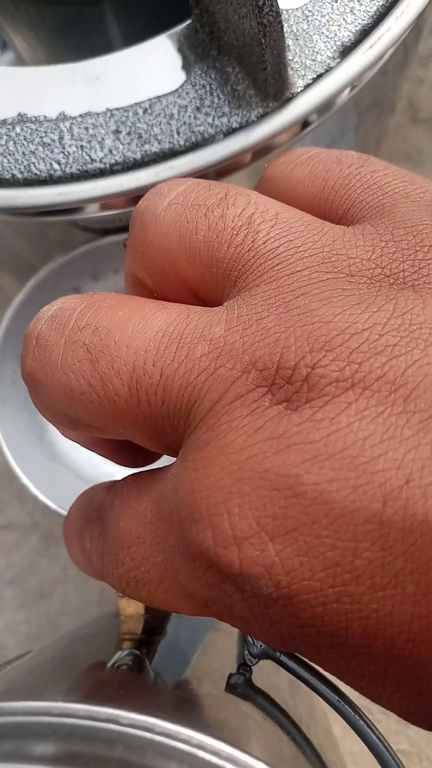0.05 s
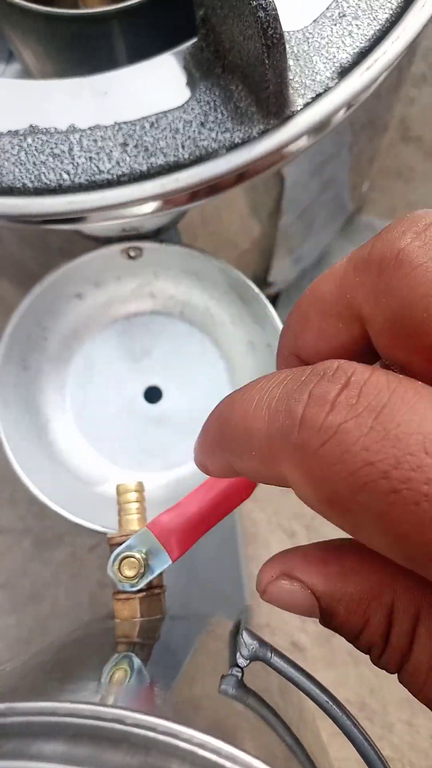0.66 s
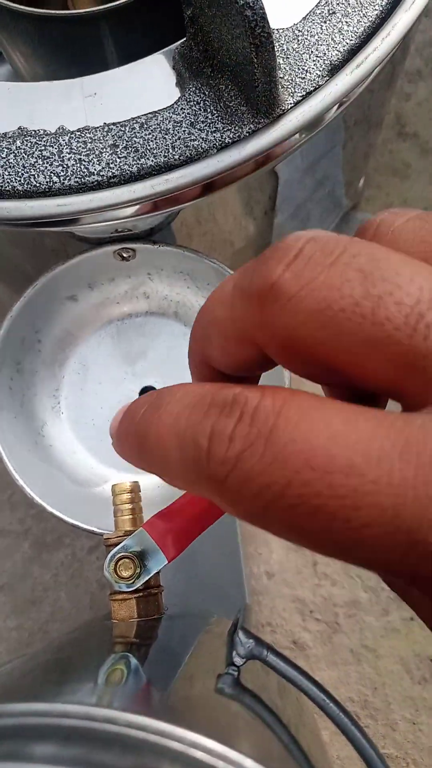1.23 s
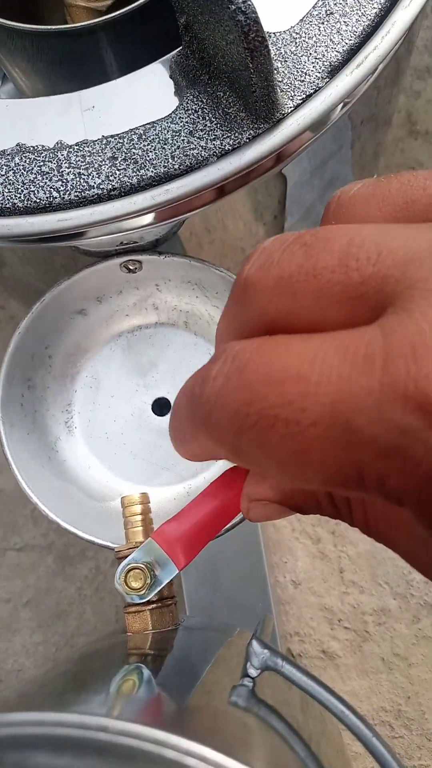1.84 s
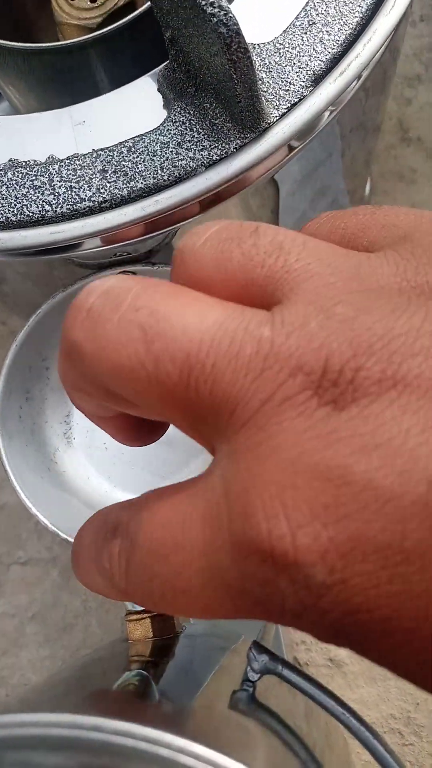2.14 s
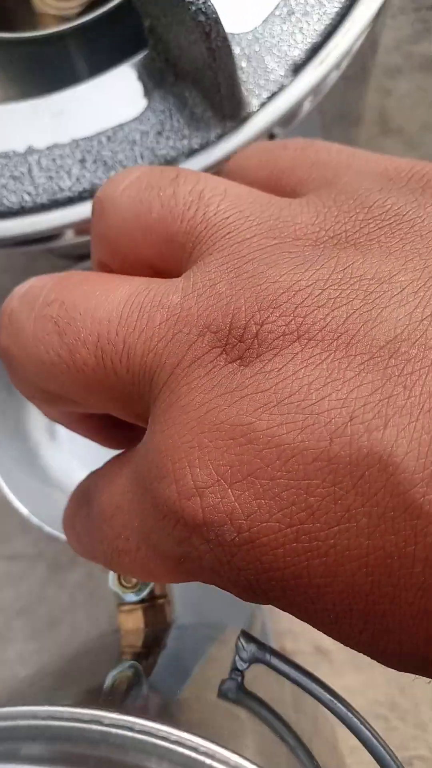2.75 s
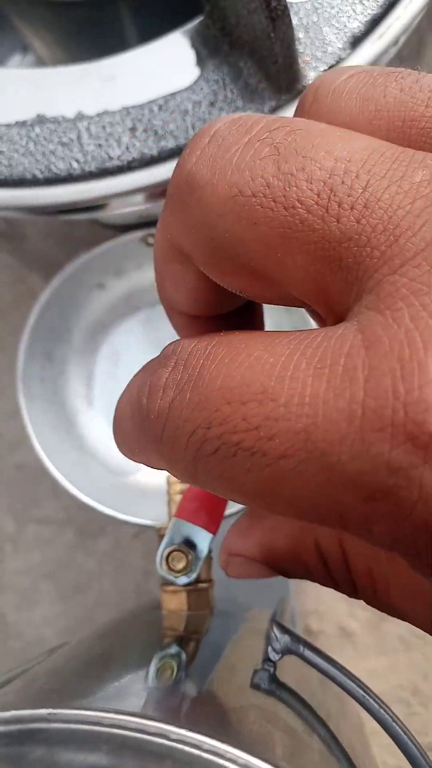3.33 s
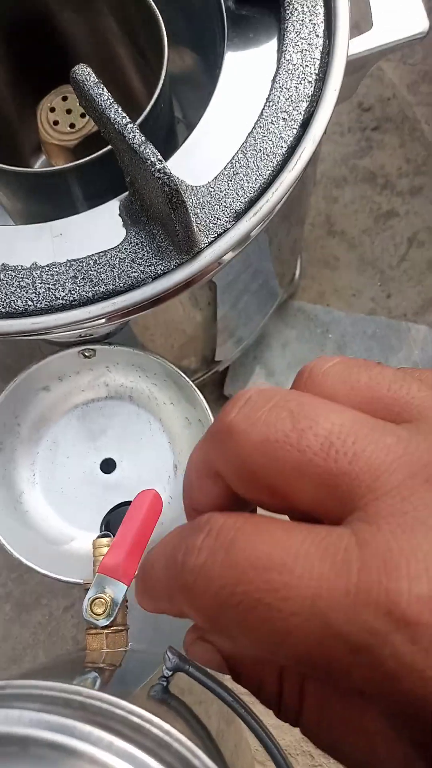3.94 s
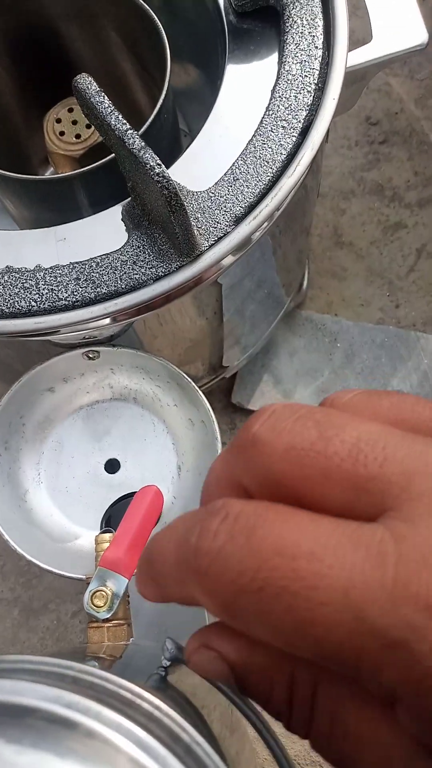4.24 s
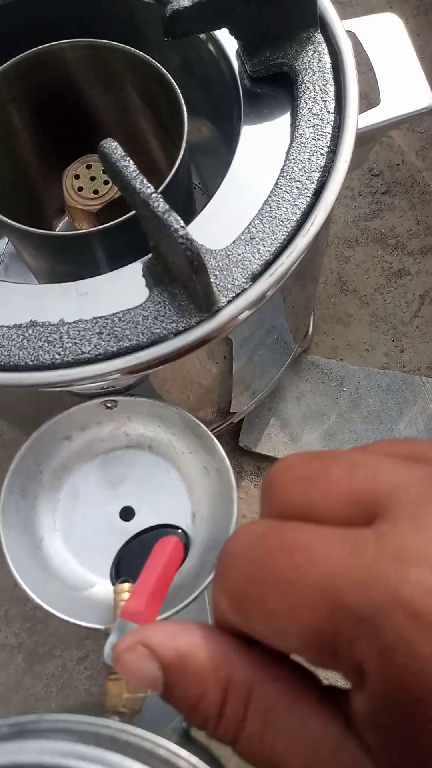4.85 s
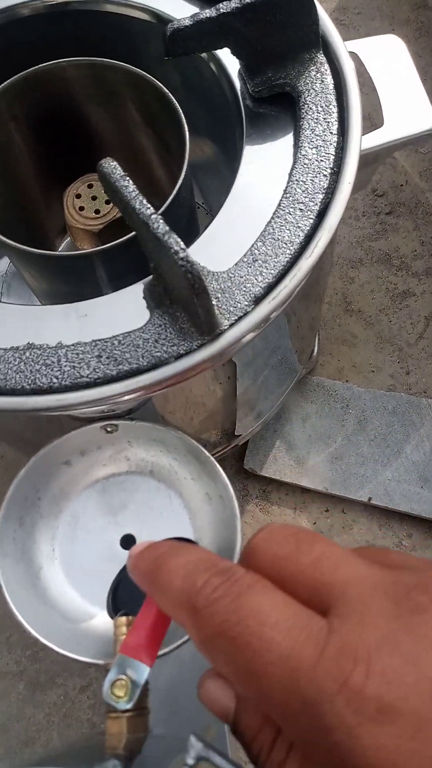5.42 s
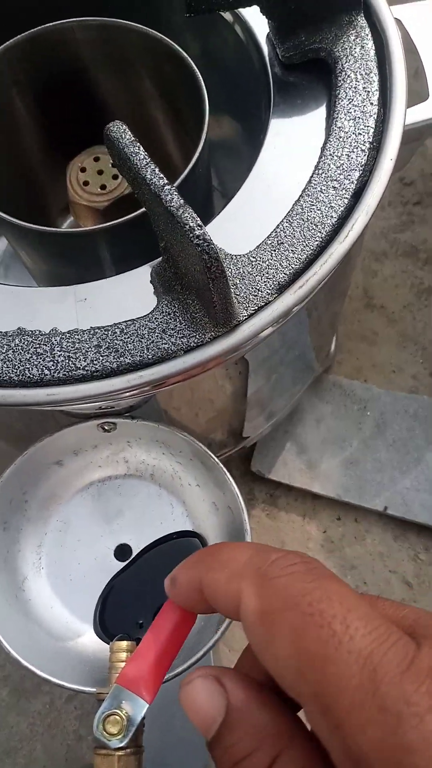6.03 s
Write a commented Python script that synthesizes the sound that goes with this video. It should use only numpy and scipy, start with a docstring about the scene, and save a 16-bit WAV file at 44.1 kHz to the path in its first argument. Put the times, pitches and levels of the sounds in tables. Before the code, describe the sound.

A distant engine hums in a yard while a hand brushes softly over a steel stove close to the microphone. A bird gives a few faint, hoarse calls. A brass valve turns with a rough, wavering squeak, and its lever grates and snaps against the stop. A songbird warbles, then comes a cluster of sharp, ringing metal clicks and scrapes, and finally a loud, dull finger thud.

```python
"""Outdoors, a far engine hums low while a hand brushes over a steel oil stove and a harsh bird calls.
From about 2 s the brass valve turns, rubbing and singing, and a songbird gives a few pips.
The valve's lever grates, clicks twice and snaps against its stop at 3.5 s; then the songbird warbles.
Around 5 s metal scrapes and clicks, ringing the steel, and at 5.7 s a finger thuds.
The yard walls echo the birds and, faintly, the knocks."""
import sys
import numpy as np
from scipy import signal
from scipy.fft import rfft, irfft, next_fast_len
from scipy.io import wavfile
from scipy.ndimage import uniform_filter1d, map_coordinates

SR = 44100
rng = np.random.default_rng(int(sys.argv[2]) if len(sys.argv) > 2 else 0)


def wav_record(signal):
    """Record a signal, one row per channel, as 16-bit PCM in the file named by sys.argv[1]."""
    frames = np.transpose(np.atleast_2d(signal))
    bounded = np.clip(frames, -1, 1)
    # unit amplitude maps onto the largest positive 16-bit level
    quanta = np.round(bounded * 32767).astype(np.int16)
    wavfile.write(sys.argv[1], SR, quanta)


N = 268171

# Tone colour of rustling skin: frequency_hz, level_db
RUSTLE_SPECTRUM = [(1200, -6.5), (2000, 2.5), (3300, 4), (4500, -2.5), (6200, -1.5), (7200, -16),
                   (8300, -27.5), (12000, -35.5)]
# Tone colour of soft, dull rubbing: frequency_hz, level_db
BRUSH_SPECTRUM = [(150, -31), (350, 11.5), (600, 15.5), (1000, -3), (1400, 10), (2000, -29), (3000, -54)]
# Tone colour of metal hitting metal: frequency_hz, level_db
CRACK_SPECTRUM = [(300, -32), (750, -15), (1300, -15.5), (1850, 1.5), (2500, -9), (3400, 0.5), (4400, -5),
                  (5900, 1.5), (7200, -11.5), (8500, -22.5), (11000, -32.5), (13500, -36), (14600, -25),
                  (15500, -22)]


def amp(db):
    """Turn decibels into a gain; amp(-60 * t / ring_s) fades by 60 dB in ring_s seconds."""
    return 10 ** (np.asarray(db) / 20)


def unit(x):
    """Scale a signal to an average (rms) level of 1."""
    return x / np.sqrt(np.mean(x ** 2) + 1e-20)


def along(points, hz):
    """Read between (frequency_hz, value) points, with octaves evenly spaced."""
    point_hz, values = np.transpose(points)
    return np.interp(np.log(hz + 1), np.log(point_hz + 1), values)


def level_curve(rows):
    """A level in dB for every sample from (time_s, level_db) rows, fading fast outside them."""
    times, levels = np.transpose(rows)
    t = np.arange(N) / SR
    outside_s = np.abs(t - np.clip(t, times[0], times[-1]))
    return np.interp(t, times, levels) - 200 * outside_s


def wobble(rate, size=N):
    """A smooth random curve that passes through rate new values a second."""
    values = rng.standard_normal(int(size * rate / SR) + 4)
    return map_coordinates(values, [np.arange(size) * rate / SR])


def swell(length_s, shape):
    """An arch that rises and falls; a smaller shape gives a flatter top."""
    return np.abs(np.sin(np.linspace(0, np.pi, int(length_s * SR)))) ** shape


def filtered(x, response):
    """Pass a sound through a filter: a function that gives the gain at each frequency."""
    size = next_fast_len(len(x) + 8192)
    return irfft(rfft(x, size) * response(np.fft.rfftfreq(size, 1 / SR)), size)[:len(x)]


def lowpass(cutoff_hz, steepness, response=lambda hz: 1):
    """A filter that cuts the highs, on top of another filter if one is given."""
    return lambda hz: response(hz) / (1 + (hz / cutoff_hz) ** steepness)


def colour(points, tilt_db=0):
    """A filter through (frequency_hz, level_db) points, brighter by tilt_db per octave."""
    return lambda hz: amp(along(points, hz) + tilt_db * np.log2((hz + 1) / 4000))


def body(modes):
    """A filter made of resonances, each (pitch_hz, width_hz, level_db)."""
    return lambda hz: sum(amp(db) * 1j * hz * width / (pitch ** 2 - hz ** 2 + 1j * hz * width)
                          for pitch, width, db in modes)


def noise(response, size=N):
    """Filtered noise with an average level of 1."""
    return unit(filtered(rng.standard_normal(size), response))


def patchy(x, depth_db):
    """Give a noise drifting louder and softer patches; the top treble stays smooth."""
    hz, _, spectra = signal.stft(x, SR, nperseg=1024)
    patches = uniform_filter1d(rng.standard_normal(spectra.shape), size=6, axis=0)
    patches = uniform_filter1d(patches, size=14, axis=1)
    gain = amp(depth_db * lowpass(7500, 8)(hz[:, None]) * np.tanh(unit(patches)))
    return unit(signal.istft(spectra * gain, nperseg=1024)[1][:N])


def shortest_pulse(points, size=4096):
    """The shortest pulse with this tone colour, with a peak of 1."""
    cepstrum = irfft(np.log(colour(points)(np.fft.rfftfreq(size, 1 / SR))))
    # folding the second half onto the first packs the energy at the start
    cepstrum[1:size // 2] *= 2
    cepstrum[size // 2:] = 0
    pulse = irfft(np.exp(rfft(cepstrum)))
    return pulse / np.abs(pulse).max()


def add(track, start_s, sound):
    """Mix a sound into a track."""
    room = track[round(start_s * SR):][:len(sound)]
    room += sound[:len(room)]


def yard_echo(x):
    """The walls throw a sound back, and each frequency dies away at its own speed."""
    # How long the echo lasts: frequency_hz, ring_s
    echo_times = [(200, 0.36), (2500, 0.34), (6000, 0.057), (12000, 0.23)]
    hz, t, spectra = signal.stft(rng.standard_normal(SR // 2), SR, nperseg=256)
    fade = amp(-60 * t / along(echo_times, hz)[:, None])
    tail = signal.istft(spectra * fade, SR, nperseg=256)[1]
    return signal.fftconvolve(x, tail / np.linalg.norm(tail))[:N]


def background():
    """A far engine drones in a few low bands over outdoor air and microphone hiss."""
    # The engine's slow rise and fall: time_s, level_db
    hum_levels = [(0.0, -48), (0.25, -49.5), (0.91, -48), (1.17, -51), (1.58, -51.5), (1.95, -49.5),
                  (2.3, -50), (2.7, -48), (3.5, -50), (3.8, -49.5), (4.4, -49), (4.85, -48.5),
                  (5.61, -47.5), (6.08, -48)]
    # The engine's low bands: pitch_hz, width_hz, level_db
    hum_bands = [(72, 6.6, 1.5), (93.1, 8.4, -0.5), (127.6, 21.7, 0), (172.6, 12.9, 3), (271, 33, -15)]
    # Tone colour of the air: frequency_hz, level_db
    air_spectrum = [(30, -25), (100, 3.5), (300, -2), (520, -0.5), (700, -8), (950, -24.5), (1300, -3.5),
                    (2000, -7), (2500, -25), (3100, -12), (4400, -19.5), (6200, -19.5), (8300, -42),
                    (15800, -41)]
    # Tone colour of the hiss: frequency_hz, level_db
    hiss_spectrum = [(12500, -26), (13800, -14), (14500, -2), (15800, 0)]
    engine = lowpass(520, 4, body(hum_bands))
    drone = noise(lambda hz: engine(hz) * hz ** 3 / (hz ** 3 + 48 ** 3))  # thins out below 48 Hz
    air = patchy(noise(colour(air_spectrum)), depth_db=9)
    hum_db = level_curve(hum_levels) + 2 + 2 * wobble(12)
    return amp(hum_db) * drone + amp(-60) * air + amp(-85.5) * noise(colour(hiss_spectrum))


def faint_noise_bands():
    """Faint, narrow bands of noise come and go, each holding one pitch."""
    # Faint held bands: start_s, length_s, pitch_hz, level_db
    bands = [(0, 0.17, 3160, -65.5), (0.119, 0.18, 1280, -60.5), (0.397, 0.41, 5680, -72.5),
             (0.705, 0.41, 1810, -61), (0.852, 0.14, 860, -59.5), (0.944, 0.31, 4360, -69.5),
             (1.087, 0.18, 2580, -68), (1.586, 0.18, 4330, -69.5), (1.702, 0.31, 5810, -76),
             (2.697, 0.27, 4280, -68), (3.052, 0.46, 5780, -70.5), (3.602, 0.21, 5650, -75),
             (4.055, .14, 910, -69.5), (4.307, 0.17, 3540, -63)]
    out = np.zeros(N)
    for start_s, length_s, pitch_hz, db in bands:
        arch = swell(length_s, 0.095)
        band = body([(pitch_hz, 260, 0)])
        add(out, start_s, amp(db) * arch * noise(lambda hz: band(hz) ** 2, len(arch)))
    return out


def airy_slides():
    """A narrow band of noise sinks in pitch, slowly at first and then faster, wavering a little."""
    # Thin falling tones: start_s, length_s, start_hz, end_hz, level_db
    slides = [(0.0, 0.16, 4220, 4030, -67.5), (0.467, 0.18, 4380, 4060, -69.5),
              (.63, 0.24, 3480, 3180, -59.5), (1.46, 0.14, 3130, 2900, -68),
              (1.953, 0.2, 4340, 3800, -65.5), (2.27, 0.21, 3760, 3460, -70.5),
              (2.86, 0.15, 4400, 4010, -63.5)]
    out = np.zeros(N)
    for start_s, length_s, start_hz, end_hz, db in slides:
        arch = swell(length_s, 0.5)
        size = len(arch)
        hz = start_hz + (end_hz - start_hz) * np.linspace(0, 1, size) ** 2 + 50 * wobble(35.55, size)
        low_noise = signal.hilbert(noise(lowpass(300, 2), size))
        band = np.real(low_noise * np.exp(2j * np.pi * np.cumsum(hz) / SR))  # shifted up by hz
        add(out, start_s, amp(db) * arch * band)
    return out


def harsh_bird():
    """A hoarse note rises and falls in an arch, its overtones shaped by the bird's throat."""
    # Far calls: start_s, length_s, top_hz, bend (share the ends drop), level_db, tilt_db, rasp (0-1)
    calls = [(0.87, 0.15, 625, 0.19, -54, 3.5, 0.2), (1.697, 0.16, 592, 0.17, -54.5, 2.5, 0.28),
             (2.406, 0.072, 842, 0.065, -50.5, -6, 0.37), (2.537, 0.17, 585.4, 0.19, -51, -4.5, 0.6)]
    # The throat's filter: frequency_hz, level_db
    throat_spectrum = [(500, -23.5), (850, -2), (1250, -1.5), (1750, -1), (2300, 2), (2700, -19),
                       (3000, -3.5), (3500, -2), (4000, -31), (7000, -62)]
    out = np.zeros(N)
    for start_s, length_s, top_hz, bend, db, tilt_db, rasp in calls:
        arch = swell(length_s, 1.0)
        size = len(arch)
        jitter = .021 * (wobble(400, size) + .6 * wobble(45, size))
        hz = top_hz * (1 - bend * (1 - arch) + jitter)
        phase = 2 * np.pi * np.cumsum(hz) / SR
        throat = colour(throat_spectrum, tilt_db)
        voice = sum(throat(k * hz) * np.sin(k * phase) * (1 + min(rasp, .5) * wobble(251.6, size))
                    for k in range(1, 11))
        breath = min(rasp, .4) * noise(throat, size)
        add(out, start_s, amp(db) * np.sqrt(arch) * (unit(voice) + breath))
    return out


def songbird():
    """Quick whistles leap from one pitch to another; a fast flutter of pitch and level roughens them."""
    # Five kinds of note, all listed as: start_s, start_hz, end_hz, level_db
    flicks = [(3.983, 2750, 3260, -54), (4.311, 2860, 3410, -57.5), (4.7, 2820, 3330, -52.5),
              (5.537, 2920, 3300, -53), (5.656, 3670, 3910, -54.5)]  # high notes that open a phrase
    slurs = [(3.997, 1640, 2530, -53), (4.319, 1637, 2560, -51), (4.711, 1597, 2490, -52.5),
             (4.99, 1346, 1766, -58.5), (5.553, 1650, 2350, -55.5), (5.68, 1628, 2290, -52),
             (5.84, 1630, 2360, -55.5)]  # rough upward sweeps
    lilts = [(2.428, 2150, 2357, -50.5), (4.139, 2006, 2140, -47), (4.175, 2180, 2434, -51.5),
             (4.478, 1950, 1940, -48.5), (4.52, 2210, 2380, -51), (4.843, 1847, 1990, -53.5),
             (4.888, 2210, 2330, -55), (5.59, 2300, 2450, -51.5), (5.738, 2290, 2464, -50.5),
             (5.79, 2660, 2780, -53.5), (5.892, 2194, 2410, -48)]  # gentle notes
    pips = [(2.543, 2245, 2177, -44), (2.563, 2210, 2100, -48.5), (5.543, 2756, 2877, -42),
            (5.648, 2750, 2890, -54), (5.675, 3200, 3364, -47), (5.832, 3440, 3260, -47),
            (5.962, 2740, 2880, -49)]  # short rough notes
    chips = [(2.532, 6800, 6300, -64), (2.641, 6660, 6050, -54.5)]  # thin high notes
    # notes, length_s, leap_at (share of the note), roughness (0-1)
    kinds = [(flicks, .024, .42, .17), (slurs, .056, .55, .42), (lilts, .032, .3, .16),
             (pips, .024, .25, .24), (chips, .013, .5, .18)]
    out = np.zeros(N)
    for notes, length_s, leap_at, roughness in kinds:
        size = int(length_s * SR)
        glide = (1 + np.tanh((np.linspace(0, 1, size) - leap_at) / 0.21)) / 2
        for start_s, start_hz, end_hz, db in notes:
            hz = (start_hz + (end_hz - start_hz) * glide) * (1 + .13 * roughness * wobble(900, size))
            level = amp(db) * swell(length_s, 0.32) * (1 + 1.2 * roughness * wobble(418, size))
            add(out, start_s, level * np.sin(2 * np.pi * np.cumsum(hz) / SR))
    return out


def hand():
    """Skin brushes and rustles with each stroke of the hand, its colour always shifting."""
    # Strokes of the hand: start_s, length_s, rustle_db, brush_db
    strokes = [(0, 0.2, -73, -63), (0.37, 0.29, -68, -50.5), (0.631, 0.79, -65, -47),
               (1.42, 0.73, -66, -65), (2.088, 0.28, -62, -48), (2.437, 0.65, -58.5, -52.5),
               (3.05, 0.34, -67, -54), (3.327, 0.47, -61, -52.5), (4.168, 0.51, -61, -58.5),
               (4.843, 0.42, -60, -50), (5.316, 0.31, -61, -54.5), (5.588, 0.46, -55.5, -56.5)]
    rustle_level, brush_level = np.zeros(N), np.zeros(N)
    for start_s, length_s, rustle_db, brush_db in strokes:
        stroke = swell(length_s, 0.54)
        add(rustle_level, start_s, amp(rustle_db) * stroke)
        add(brush_level, start_s, amp(brush_db) * stroke)
    rustle = patchy(noise(colour(RUSTLE_SPECTRUM)), depth_db=13)
    brush = patchy(noise(colour(BRUSH_SPECTRUM)), depth_db=4)
    flicker = amp(-1 + 0.89 * wobble(150))
    return rustle_level * flicker * rustle + brush_level * amp(-8) * brush


def finger_taps():
    """A soft finger gives one dead, low push with a faint tick."""
    # Dull taps: start_s, level_db
    taps = [(0.4313, -39.5), (1.582, -46.5), (5.7085, -10), (5.752, -28)]
    # Tone colour of the push: frequency_hz, level_db
    thud_spectrum = [(47, -19), (80, -7), (242, 3.5), (404, -1), (776, -10.5), (1090, -27), (1400, -20),
                     (1780, -38), (3290, -34), (6310, -50), (9000, -62), (11700, -100), (19800, -120)]
    out, t = np.zeros(N), np.arange(SR // 10) / SR
    for start_s, db in taps:
        add(out, start_s, amp(db) * shortest_pulse(thud_spectrum))
        add(out, start_s, amp(db - 30 - 60 * t / 0.08) * noise(colour(RUSTLE_SPECTRUM), len(t)))
    return out


def steel_ring(t, tilt_db):
    """Struck steel rings on many shimmering tones, in a slightly different mix each time."""
    # The steel's own tones: pitch_hz, level_db, ring_s
    steel_tones = [(1793, -4, .09), (2299, -3, .08), (2649, -5, .09), (2896, -6, .12), (3065, 0, .13),
                   (3472, -1, .24), (3625, -4, .12), (3860, -4, .11), (4538, -13, .08), (4980, -11, .07),
                   (5677, -10, .07), (6081, -11, .07), (7011, -22, .09), (7627, -34, .22)]
    ring = np.zeros(len(t))
    for hz, db, ring_s in steel_tones:
        start_db = db + rng.standard_normal() + tilt_db * np.log2(hz / 4000)
        shimmer = .45 * wobble(150, len(t))
        ring += amp(start_db - 60 * t / ring_s) * np.sin(2 * np.pi * hz * t + shimmer)
    return ring * (1 - np.exp(-t / 0.00081))


def metal_clicks():
    """Each contact chatters and cracks, rings the steel and knocks the stove's shell."""
    # Metal contacts: start_s, level_db, tilt_db (brightness per octave)
    clicks = [(2.839, -41, -6), (2.891, -43.5, -5.5), (4.982, -49, 5), (5.0465, -37, 7), (5.06, -35, 1.5),
              (5.091, -33, 5.5), (5.102, -33.5, 10.5), (5.175, -33, 22), (5.256, -24, 1.5),
              (5.38, -27, 2.5), (5.419, -39, -3.5), (5.8325, -53.5, 5)]
    # Resonances of the sheet-metal shell: pitch_hz, width_hz, level_db
    shell = [(293, 260, 13.5), (510, 210, 5), (763, 170, -29)]
    out, t = np.zeros(N), np.arange(SR // 3) / SR
    fading_s = np.maximum(t - .004, 0)  # a contact chatters for 4 ms before it dies
    for start_s, db, tilt_db in clicks:
        contact = colour(CRACK_SPECTRUM, tilt_db)
        chatter = amp(5.5 * np.tanh(wobble(900, len(t)))) * (1 - np.exp(-t / 0.00038))
        # the highest treble lives only in the first instant
        snap = chatter * noise(lambda hz: contact(hz) * (1 + hz / 6000), len(t))
        snap *= amp(-60 * fading_s / 0.047)
        crack = chatter * noise(lowpass(8500, 8, contact), len(t))
        crack *= amp(-60 * fading_s / .036) + amp(-20 - 60 * t / .11)
        knock = noise(body(shell), len(t)) * amp(-60 * t / 0.15) * (1 - np.exp(-t / 0.0078))
        knock = filtered(knock, lowpass(1500, 4))
        knock_db = -9 - 1.7 * abs(tilt_db)  # glancing blows knock the shell less
        ring = steel_ring(t, tilt_db)
        click = amp(-10) * crack + amp(-18) * snap + amp(-15) * ring + amp(knock_db) * knock
        add(out, start_s, amp(db) * click)
    return out


def metal_scrapes():
    """Metal slides on metal in a dense run of tiny slips that ring the steel."""
    # Scrapes: start_s, length_s, level_db, tilt_db (brightness per octave)
    scrapes = [(5.045, 0.055, -45.5, 4.5), (5.089, 0.06, -37, 7), (5.152, 0.046, -48.5, 6)]
    out, t = np.zeros(N), np.arange(SR // 3) / SR
    for start_s, length_s, db, tilt_db in scrapes:
        size = int(length_s * SR)
        # each slip is a burst of its own strength, under a millisecond long
        slips = rng.standard_normal(size) * amp(3.8 * wobble(1500, size) + 2 * wobble(250, size))
        early_swell = np.abs(np.sin(np.pi * np.linspace(0, 1, size) ** 0.61)) ** 0.57
        scrape = amp(db) * early_swell * unit(filtered(slips, colour(CRACK_SPECTRUM, tilt_db)))
        add(out, start_s, scrape)
        add(out, start_s, amp(-42) * signal.fftconvolve(scrape, steel_ring(t, tilt_db)))
    return out


def lever_grating():
    """The lever slips grittily on its seat, squeaking over a dull grinding; at times it catches."""
    # The lever's resonances: pitch_hz, width_hz, level_db
    lever_bands = [(2850, 200, 0.5), (3830, 220, 4.5), (4590, 190, 7), (5400, 230, -4), (6200, 110, -12),
                   (6650, 30, 2), (8100, 120, -12), (10400, 230, -4)]
    # Grating strokes: start_s, length_s, squeak_db, grind_db
    grates = [(2.778, .16, -59, -51.5), (3.41, 0.17, -54, -77)]
    # Ticks where the lever catches: start_s, level_db
    catches = [(2.861, -51), (3.458, -51), (3.467, -49), (3.474, -42.5), (3.481, -46), (3.49, -49),
               (3.4982, -45), (3.513, -51), (3.526, -51)]
    out, t = np.zeros(N), np.arange(SR // 10) / SR
    metallic = lowpass(7400, 10, body(lever_bands))
    for start_s, length_s, squeak_db, grind_db in grates:
        size = int(length_s * SR)
        stroke = np.sin(np.pi * np.linspace(0, 1, size) ** 1.07)  # peaks just after midway
        slips = rng.standard_normal(size) * amp(2.5 * (wobble(1200, size) + np.tanh(wobble(199, size))))
        squeak = amp(squeak_db) * unit(filtered(slips, metallic))
        grind = amp(grind_db) * noise(colour(BRUSH_SPECTRUM), size)
        add(out, start_s, stroke * (squeak + grind))
    for start_s, db in catches:
        add(out, start_s, amp(db - 60 * t / .02) * noise(metallic, len(t)))
    return out


def lever_stop():
    """The lever snaps against its stop: a bright crack and a short ring with one lingering high tone."""
    # The struck lever's tones: pitch_hz, level_db, ring_s
    lever_tones = [(1535, -9, 0.11), (2170, 3.5, 0.046), (2440, -3, 0.03), (3030, -13, .04),
                   (3640, -8, 0.084), (4250, -19, 0.064), (4470, -9, 0.11), (7000, -21.5, 0.53)]
    out, t = np.zeros(N), np.arange(SR // 2) / SR
    ring = sum(amp(db - 60 * t / ring_s) * np.sin(2 * np.pi * hz * t + 0.32 * wobble(300, len(t)))
               for hz, db, ring_s in lever_tones)
    crack = noise(lowpass(5200, 4, colour(CRACK_SPECTRUM)), len(t)) * amp(-60 * t / 0.049)
    hit = (amp(-41) * ring + amp(-41.5) * crack) * (1 - np.exp(-t / .0005))
    add(out, start_s=3.5316, sound=filtered(hit, lowpass(8200, 8)))
    return out


def valve():
    """The turning valve rubs unevenly and sings on a hoarse note that wanders with the grip."""
    # Friction during the turn: time_s, level_db, pitch_hz
    turn = [(2.099, -82, 1450), (2.137, -57, 1420), (2.226, -51.5, 1354), (2.36, -58.5, 1288),
            (2.458, -59, 1311), (2.68, -48.5, 1406), (2.79, -50, 1424), (2.96, -59, 1395),
            (3.064, -50, 1366), (3.3, -53.5, 1336), (3.428, -51, 1397), (3.58, -64.5, 1445)]
    # Clean tones of the singing: pitch_multiple, level_db
    singing_tones = [(.5, -16.5), (1, -6.5), (1.5, -20)]
    # The valve's resonances: pitch_hz, width_hz, level_db
    valve_bands = [(675, 71, -4), (820, 52, -3), (1260, 260, -3.5), (1882, 61, -3)]
    times, _, pitches = np.transpose(turn)
    hz = np.interp(np.arange(N) / SR, times, pitches)
    low_noise = noise(lowpass(96, 2))  # blurs the note by about 96 Hz on each side
    hoarse = np.sqrt(2) * low_noise * np.cos(2 * np.pi * np.cumsum(hz) / SR + wobble(60))
    phase = 2 * np.pi * np.cumsum(hz * (1 + .012 * wobble(70))) / SR
    tone = sum(amp(db + 3.2 * wobble(45)) * np.sqrt(2) * np.sin(k * phase) for k, db in singing_tones)
    friction = noise(lowpass(2300, 8, body(valve_bands)))
    turn_db = level_curve([row[:2] for row in turn])
    return amp(turn_db) * (tone + amp(-5) * hoarse + amp(-4.5) * friction)


def scene():
    """Mix it all: the near knocks have little echo, the birds have plenty."""
    knocks = metal_clicks() + metal_scrapes() + finger_taps() + lever_stop()
    song, calls = songbird(), harsh_bird()
    birds = song + amp(-3) * yard_echo(song) + amp(-1) * (calls + amp(-1) * yard_echo(calls))
    no_echo = background() + hand() + faint_noise_bands() + airy_slides() + valve() + lever_grating()
    return (no_echo + knocks + amp(-19) * yard_echo(knocks) + birds)[None]


def record(dry):
    """Cut off the very highest treble."""
    return filtered(dry[0], lambda hz: hz < 15850)[None]


dry = scene()
out = record(dry)
wav_record(out)
```